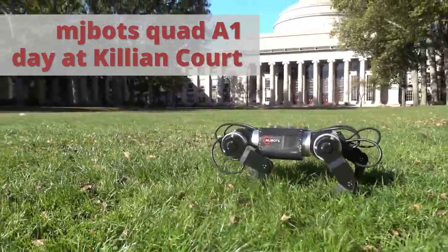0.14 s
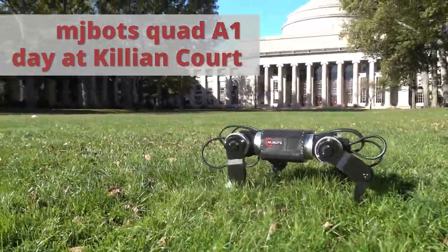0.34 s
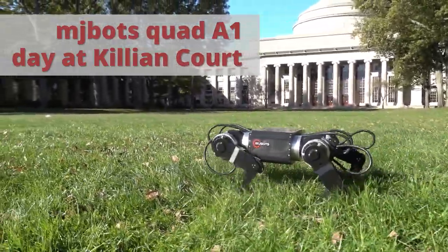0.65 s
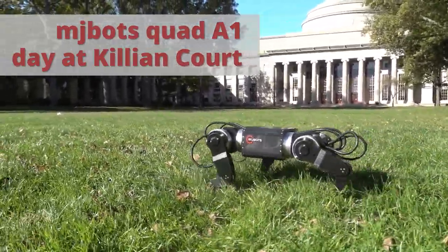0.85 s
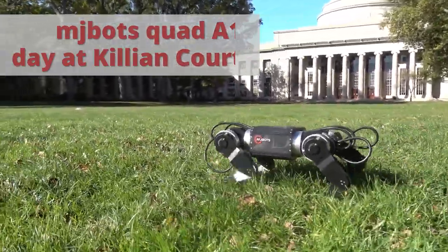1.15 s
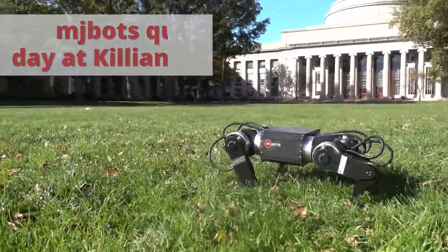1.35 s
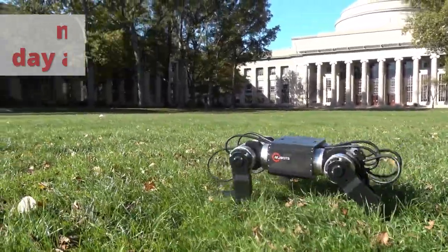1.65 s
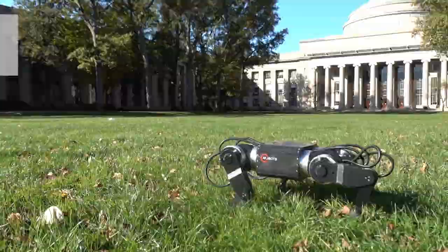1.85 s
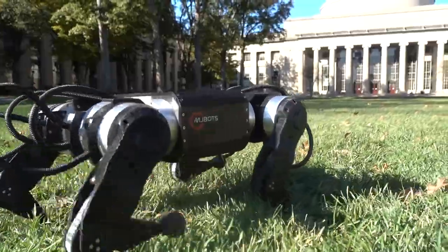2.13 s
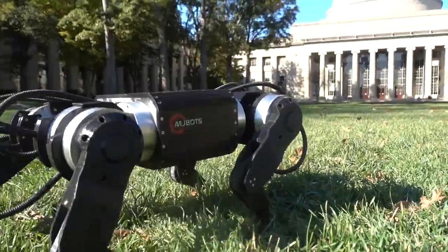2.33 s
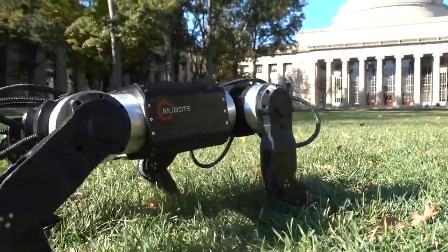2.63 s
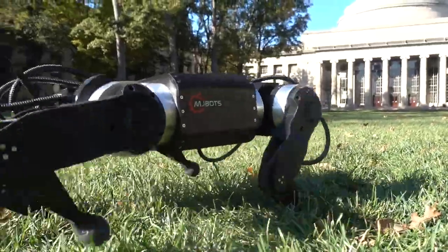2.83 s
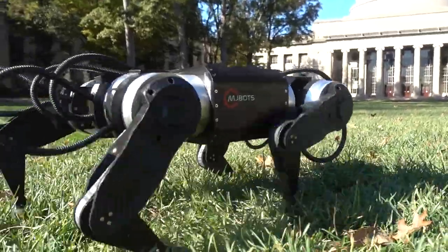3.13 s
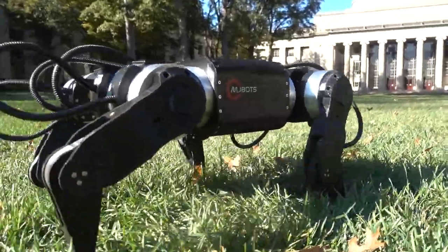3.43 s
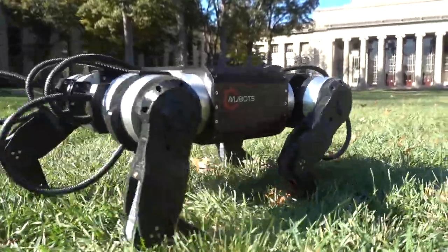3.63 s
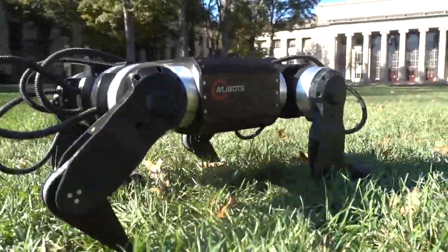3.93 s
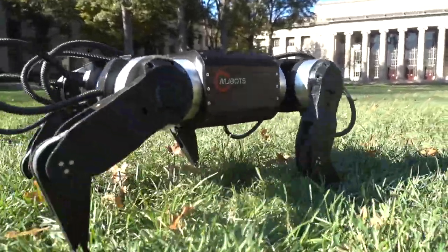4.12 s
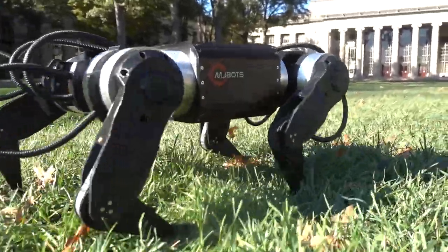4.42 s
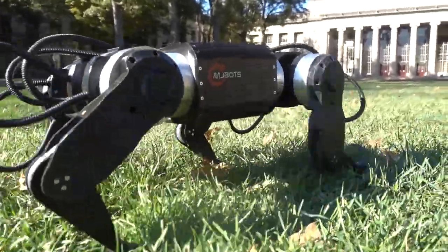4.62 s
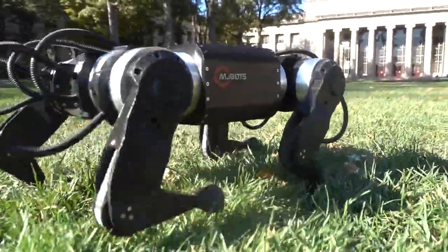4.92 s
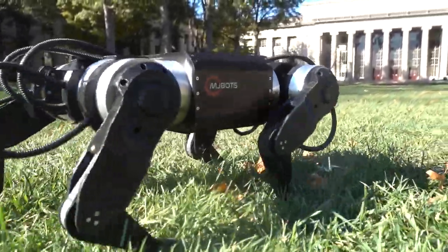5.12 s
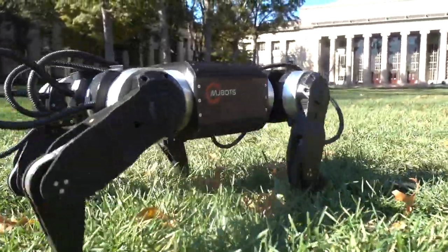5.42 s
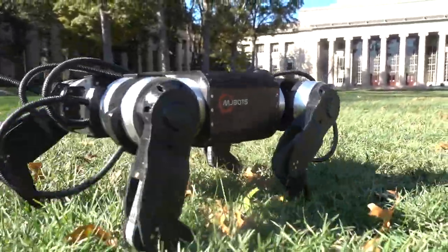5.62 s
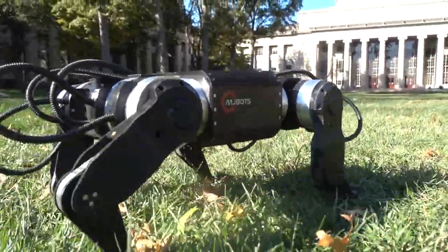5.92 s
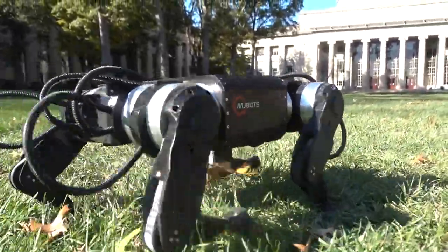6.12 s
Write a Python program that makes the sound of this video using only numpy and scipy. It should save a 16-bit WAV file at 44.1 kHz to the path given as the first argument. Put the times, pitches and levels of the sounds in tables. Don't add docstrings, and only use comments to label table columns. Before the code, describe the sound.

Open lawn, dry outdoor air, faint wide city rumble and hiss with small low wind buffets throughout. From 0 to 1.95 seconds a small four-legged robot trots some metres away: quick uneven grass swishes, muted gear chatter, bright brittle ticks and leaf snaps, busiest around 1.4 to 1.6 and sharp near 1.8, with a few dull thumps from 1 second. At 1.95 the scene cuts abruptly close. From about 2.1 to the end at roughly 6.4, steps come about every third of a second: a lift click, rough gear chatter as legs swing, brief high motor whines rising and falling, knocking gears as they reverse, then a landing clack and soft hollow thump. Strong clunks stand out near 4.4 and 5.0. Feet drag crisply through grass, especially near 3.25 and 5.3. The stereo microphone hears the close legs wide and detailed.

```python
import sys
import numpy as np
from scipy import signal
from scipy.fft import rfft, irfft, next_fast_len
from scipy.io import wavfile
from scipy.ndimage import uniform_filter1d, map_coordinates

SR = 44100
rng = np.random.default_rng(int(sys.argv[2]) if len(sys.argv) > 2 else 0)


def unload_wav(signal):
    wavfile.write(
        sys.argv[1],
        SR,
        np.round(np.clip(np.atleast_2d(signal).T, -1, 1) * 32767).astype(np.int16),
    )


def linear_from_db(decibels):
    return 10 ** (np.asarray(decibels, float) / 20)


N = 276066
TIME = np.arange(N) / SR
CUT = 1.951
TOP_HZ = 15850


def unit(x):
    return x / np.sqrt(np.mean(x ** 2) + 1e-20)


def along(points, hz):
    f, value = np.transpose(points)
    return np.interp(np.log(hz + 1), np.log(f + 1), value)


def filtered(x, response):
    m = next_fast_len(N + 8192)
    return irfft(rfft(x, m) * response(np.fft.rfftfreq(m, 1 / SR)), m)[..., :N]


def body(modes):
    def response(f):
        total = 0
        for k, (centre, width, db) in enumerate(modes):
            damping = 1j * f * width
            total = total + (-1) ** k * linear_from_db(db) * damping / (centre * centre - f * f + damping)
        return total
    return response


def wobble(rate):
    return map_coordinates(rng.standard_normal(int(N * rate / SR) + 4), [np.arange(N) * rate / SR])


# pitch_hz, level_db per Hz
CITY_COLOUR = [(20, -34), (65, -17), (100, -13.5), (223, -10.5), (309, -12.5), (373, -11), (560, -12.5),
               (714, -10.5), (840, -10.5), (1610, -11.5), (4490, -18.5), (11300, -20), (16000, -18.5)]
# pitch_hz, side_over_mid_db
CITY_WIDTH = [(60, -10), (300, -4), (1300, -7), (4400, -1), (15000, -9)]
# time_s, level_db
CITY_SWELL = [(0.0, -58), (.12, -56), (.25, -60), (.4, -59), (.46, -66), (.74, -55), (.88, -56), (1.0, -59),
              (1.14, -62), (1.25, -57), (1.38, -64), (1.62, -57), (1.8, -62), (2.1, -62), (2.35, -61),
              (2.55, -67), (2.83, -57), (3.08, -59), (3.3, -62), (4.1, -62), (4.35, -58), (4.77, -64),
              (5.99, -65), (6.25, -58)]


def city():
    swell = linear_from_db(np.interp(TIME, *np.transpose(CITY_SWELL)) + 2.0 + 1.6 * wobble(14))

    def tint(f):
        return linear_from_db(along(CITY_COLOUR, f) + [0 * f, along(CITY_WIDTH, f)])

    pair = filtered(rng.standard_normal((2, N)), tint)
    bass = filtered(pair, lambda f: 1 / (1 + (f / 400) ** 4))
    hiss = pair - bass
    hiss_gain = linear_from_db(-49.5 - 1.2 * (TIME > CUT))
    mid, side = swell * bass / np.std(bass[0]) + hiss_gain * hiss / np.std(hiss[0])
    return np.array([mid + side, mid - side])


# peak_s, half_length_s, level_db, pitch_hz
WIND_PUFFS = [(.09, .07, -55, 280), (.3, .06, -60, 150), (.75, .03, -55, 200), (.99, .04, -58, 180),
              (1.24, .04, -52, 250), (1.32, .015, -56, 250), (1.56, .04, -59, 200), (1.955, .012, -55, 220),
              (2.05, .012, -55, 230), (2.37, .012, -56, 280), (2.435, .022, -50, 180),
              (2.77, .04, -55, 220), (2.84, .03, -50, 200), (3.005, .022, -50, 190), (3.12, .015, -57, 280),
              (3.48, .02, -59, 200), (3.62, .02, -56, 220), (3.86, .03, -60, 200), (4.44, .02, -56, 230),
              (4.53, .02, -56, 230), (6.25, .02, -55, 200)]


def puffs():
    out, t = np.zeros((2, N + SR)), np.arange(SR // 2) / SR
    apart = .5
    noises = rng.standard_normal((len(WIND_PUFFS), 2, len(t)))
    for (s, half, db, hz), noise in zip(WIND_PUFFS, noises):
        bell = np.exp(-((t - .25) / half) ** 2)
        band = signal.butter(2, [hz / 1.6, hz * 1.6], "bandpass", fs=SR)
        mid, side = signal.lfilter(*band, noise)
        lump = bell * np.array([mid + apart * side, mid - apart * side])
        level = linear_from_db(db + 2.5) * np.linalg.norm(bell) / np.linalg.norm(bell * mid)
        start = round(s * SR) + SR // 4
        out[:, start:start + len(t)] += level * lump
    return out[:, SR // 2:][:, :N]


# start_s, peak_db, pitch_hz
BODY_KNOCKS = [(0.981, -49, 324), (1.064, -46.5, 400), (1.527, -43.5, 713), (1.948, -42.5, 497),
               (2.05, -48, 473), (2.189, -44, 360), (2.369, -61, 342), (2.645, -45, 345),
               (2.75, -45.5, 285), (3.025, -45.5, 287), (3.116, -58, 350), (3.619, -41, 312),
               (3.842, -49, 482), (4.28, -43.5, 360), (4.344, -43, 700), (4.622, -48, 623),
               (4.445, -46, 330), (4.7, -48, 340), (4.961, -42, 348), (2.7, -44, 340), (2.94, -44, 335),
               (3.165, -47, 335), (5.05, -47, 340), (5.181, -45.5, 397), (5.297, -44, 554),
               (5.6, -42, 330), (6.149, -47, 630)]


def knocks():
    out, t = np.zeros(N + SR), np.arange(SR // 8) / SR
    dull_band = signal.butter(2, [250, 900], "bandpass", fs=SR)
    noises = rng.standard_normal((len(BODY_KNOCKS), len(t)))
    for (s, db, hz), noise in zip(BODY_KNOCKS, noises):
        dull = unit(signal.lfilter(*dull_band, noise))
        ring = np.sin(2 * np.pi * hz * t) + 0.8 * dull
        push = 1 - np.exp(-t / 0.0016)
        fade = linear_from_db(db + 4.5 - 60 * t / 0.064)
        out[round(s * SR):][:len(t)] += fade * push * ring
    return out[:N]


# start_s, peak_db, pitch_hz
FAR_TICKS = [(.0144, -24, 1800), (.0374, -23, 2200), (.0804, -30, 3000), (.2254, -26, 6000),
             (.3024, -23, 2500), (.4294, -24, 4000), (.6004, -25, 3000), (.6114, -26, 2600),
             (.6325, -28, 4500), (.6983, -25, 7000), (.7746, -24, 6900), (.8254, -22, 6850),
             (.9936, -25, 7500), (1.1274, -26, 2500), (1.1618, -21, 7060), (1.2314, -25, 3000),
             (1.2885, -26, 7070), (1.3663, -25, 8300), (1.4084, -20, 7680), (1.4374, -20, 4590),
             (1.4634, -20, 10000), (1.4764, -21, 10000), (1.5115, -20, 5000), (1.5234, -19, 11000),
             (1.5424, -22, 5000), (1.5853, -25, 8000), (1.6866, -24, 4500), (1.8044, -24, 8200),
             (1.8874, -24, 5000), (1.9264, -26, 8000)]
# start_s, peak_db, pitch_hz
CLOSE_TICKS = [(2.0348, -36, 1800), (2.1884, -20, 2400), (2.3424, -33, 3500), (2.4733, -26, 1900),
               (2.5724, -22, 5410), (2.6449, -26, 2200), (2.6628, -21, 3200), (2.6843, -16, 3450),
               (2.7124, -29, 3740), (2.7244, -29, 2500), (2.8614, -22, 4500), (2.9494, -22, 5500),
               (3.043, -30, 2420), (3.0754, -32, 4000), (3.3583, -22, 2900), (3.3987, -24, 2500),
               (3.4526, -33, 2800), (3.4694, -34, 2800), (3.6404, -22, 2500), (3.8003, -29, 4150),
               (3.8696, -23, 2500), (3.9365, -23, 2500), (4.0253, -22, 3320), (4.0751, -26, 2800),
               (4.4244, -32, 2830), (4.5426, -22, 2800), (4.6614, -27, 3000), (4.7506, -27, 3000),
               (4.8055, -30, 2500), (4.9944, -25, 3000), (5.131, -35, 11000), (5.4748, -28, 2500),
               (5.4825, -30, 12000), (5.76, -33, 11000), (5.7673, -33, 2310), (5.9963, -28, 2260),
               (6.0384, -27, 3680), (6.0492, -20, 1960), (6.1574, -22, 2300), (6.2504, -22, 3250)]


def rattles():
    out, t = np.zeros(N + SR), np.arange(500) / SR
    swell_s, gain_db, span = .0008, -1.5, 1.45
    rows = FAR_TICKS + CLOSE_TICKS
    for (s, db, hz), noise in zip(rows, rng.standard_normal((len(rows), len(t)))):
        band = signal.butter(2, [hz / span, min(hz * span, TOP_HZ)], "bandpass", fs=SR)
        burst = signal.lfilter(*band, t * np.exp(-t / swell_s) * noise)
        out[round(s * SR):][:len(t)] += linear_from_db(db + gain_db) * burst / np.abs(burst).max()
    return out[:N]


# half of left_over_right_db for housing, shell and grass
LAYER_LEAN = [0.6, -0.1, -0.9]


def leaning(layers):
    return np.array([linear_from_db(LAYER_LEAN) @ layers, linear_from_db(-np.array(LAYER_LEAN)) @ layers])


# pitch_hz, width_hz, level_db
HOUSING_MODES = [(1052, 420, -6), (1634, 480, -1), (1896, 270, 2.5), (2170, 300, 1), (2806, 624, -3.5),
                 (3650, 1040, -5.5)]


def housing(f):
    return body(HOUSING_MODES)(f) * (1j * f / 900) ** 2 / (1 + 1j * f / 900) ** 2


# lift_s, turn_s, landing_s, lift_click_db, landing_db
TROT = [(2.081, 2.185, 2.266, -28, -34), (2.4846, 2.585, 2.672, -27, -33),
        (2.8303, 2.938, 2.998, -21.5, -37), (3.1656, 3.27, 3.362, -22, -34),
        (3.511, 3.618, 3.7, -20.5, -35), (3.845, 3.945, 4.03, -21, -35.5), (4.172, 4.28, 4.36, -20, -34),
        (4.5182, 4.619, 4.71, -19, -37.5), (4.8488, 4.956, 5.045, -16.5, -33.5),
        (5.1922, 5.3, 5.377, -20, -35), (5.492, 5.6, 5.685, -17.5, -36), (5.7953, 5.9, 6.002, -19, -39.5),
        (6.0501, 6.157, 6.25, -22.5, -35)]
# start_s, level_db
LEG_TICKS = [(.208, -32), (.4425, -33), (.5376, -31), (.6722, -30.5), (.884, -29), (.9398, -32),
             (1.2163, -23), (1.3181, -29), (2.135, -25.5), (2.1902, -20), (2.2624, -22), (2.2773, -32),
             (2.6892, -19), (2.9374, -22.5), (3.0234, -36), (3.3582, -21.5), (3.3758, -29), (3.4, -29),
             (3.6173, -24), (3.6996, -30), (3.7577, -34.5), (4.2836, -20.5), (4.375, -25), (4.9583, -22),
             (5.0436, -31), (4.986, -28), (5.382, -29), (5.5996, -29), (5.9, -32), (6.157, -24),
             (6.2426, -27)]
# start_s, level_db
HOUSING_CLUNKS = [(.3878, -22), (1.949, -28), (2.248, -21), (2.3294, -26.5), (2.5662, -21), (2.6754, -19),
                  (2.983, -17), (3.1983, -18), (3.595, -20), (3.678, -19), (3.71, -30), (3.7313, -25),
                  (4.258, -22), (4.347, -20), (4.375, -12), (4.468, -30), (4.939, -21), (5.0533, -14),
                  (4.6105, -24), (4.9854, -31), (5.0218, -15), (5.0736, -35), (5.221, -22), (5.2852, -20),
                  (5.579, -24), (5.659, -19), (5.6926, -18), (5.904, -18), (5.947, -20), (6.1343, -27)]
# start_s, level_db
LEAF_SNAPS = [(.111, -32), (.2303, -23), (.3235, -19.5), (.3275, -23), (.798, -21), (.8615, -28),
              (1.0456, -25), (1.0576, -38), (1.1177, -28), (1.123, -33), (1.2506, -22), (1.787, -25),
              (1.3332, -32), (1.6675, -34), (1.721, -28), (1.783, -15.5), (1.827, -20), (1.8362, -19),
              (1.84, -20), (3.1062, -38), (3.416, -34), (5.3127, -19), (5.6781, -25.5), (5.721, -34),
              (6.2243, -23)]


def contacts():
    lifts = [(lift, lift_db) for lift, turn, land, lift_db, land_db in TROT]
    kinds = [(lifts, (-1.5, 0.1, -16)),
             (LEG_TICKS, (-10, 0.1, -10)),
             (HOUSING_CLUNKS, (0.1, -15, -27)),
             (LEAF_SNAPS, (-25, -7.5, 0.1))]
    return [(s, *np.add(colour, db)) for table, colour in kinds for s, db in table]


# pitch_hz, width_hz, level_db
STRUCK_SHELL = [(4100, 1100, -0.5), (5900, 750, 5), (8000, 1600, 1)]


def clicks():
    blows, lead = np.zeros((3, N + 900)), 130
    t = (np.arange(700) - lead) / SR
    before = .7 * np.exp(t / .0007)
    after = np.exp(-t / .0011) + .2 * np.exp(-t / .004)
    shape = np.where(t < 0, before, after)
    rows = contacts()
    for (s, *dbs), noise in zip(rows, rng.standard_normal((len(rows), len(t)))):
        burst = shape * noise
        start = round(s * SR) - lead
        blows[:, start:start + len(t)] += linear_from_db(dbs)[:, None] * burst / np.linalg.norm(burst)

    def bright(f):
        return linear_from_db(along([(4000, -39), (8000, -3), (10000, 4), (16000, 1)], f))

    low, shell, crack = blows[:, :N]
    through_housing = linear_from_db(24) * filtered(low, housing)
    through_shell = linear_from_db(24) * filtered(shell, body(STRUCK_SHELL))
    bare = linear_from_db(18) * filtered(crack, bright)
    return leaning(np.array([through_housing, through_shell, bare]))


# peak_s, top_hz, stop_s (until standstill), level_db
MOTOR_WHINES = [(2.128, 6500, .06, -48), (2.221, 6150, .07, -49), (2.524, 6400, .04, -42),
                (2.615, 7300, .06, -46), (2.876, 7600, .045, -47), (3.225, 8000, .06, -44),
                (3.562, 7300, .045, -43), (3.889, 6650, .04, -39), (4.219, 6950, .05, -39),
                (4.561, 6950, .04, -38), (4.903, 7400, .045, -42), (5.236, 6800, .045, -39),
                (5.54, 7000, .045, -45), (5.839, 6900, .045, -38), (6.099, 6600, .04, -44),
                (6.199, 5850, .05, -47)]


def whine():
    out = np.zeros(N)
    flutter, rough, coarse = wobble(470), wobble(250), wobble(250)
    for s, top_hz, stop, db in MOTOR_WHINES:
        u = np.linspace(-.6, .6, round(1.2 * stop * SR))
        start = round((s - .6 * stop) * SR)
        at = slice(start, start + len(u))
        hz = top_hz * (1 - u ** 2) * (1 + .007 * flutter[at])
        turn = 2 * np.pi * np.cumsum(hz) / SR
        mesh = rough[at] * np.sin(turn / 3) + .6 * coarse[at] * np.sin(turn / 4)
        out[at] += linear_from_db(db + 6) * np.exp(-(u / .4) ** 4) * (np.sin(turn) + mesh)
    return out * linear_from_db(2.5 * wobble(200))


def chatter(rate, spread_db, hiss, lumpy_db, patchy_db):
    hit = rng.random(N) < rate / SR
    size = linear_from_db(spread_db * np.minimum(rng.exponential(size=N), 2.3))
    impacts = hit * size * rng.choice([-1, 1], N)
    rough = linear_from_db(lumpy_db * wobble(220)) * (unit(impacts) + hiss * rng.standard_normal(N))
    z = signal.stft(rough, nperseg=256)[2]
    field = uniform_filter1d(rng.standard_normal(z.shape), size=5, axis=0)
    field = uniform_filter1d(field, size=3, axis=1)
    return signal.istft(z * linear_from_db(patchy_db * unit(field)), nperseg=256)[1][:N]


# peak_after_moment_s, rise_s, fall_s, housing_db, shell_db, grass_db
STEP_JERK = (.005, .009, .008, -35, -38, -42)
STEP_SWING = (.045, .024, .033, -34.5, -35.5, -45)
STEP_TURN = (.008, .016, .037, -33.8, -34.2, -48)
STEP_LANDING = (.001, .028, .024, 0.1, -7, -9)
STEP_SETTLE = (.03, .03, .04, -14, -18, -15)
# peak_s, rise_s, fall_s, level_db
CLOSE_DRAGS = [(2.35, .06, .1, -48), (2.487, .014, .009, -40), (2.72, .02, .012, -44),
               (2.75, .012, .006, -50), (3.02, .04, .03, -48), (3.08, .03, .03, -44), (3.46, .03, .03, -49),
               (3.8, .03, .02, -48), (3.135, .07, .03, -43), (3.25, .04, .075, -29.5),
               (3.42, .02, .02, -46), (3.72, .01, .045, -50), (3.846, .037, .005, -37.5),
               (4.03, .055, .075, -37.5), (4.356, .069, .025, -43), (5.44, .03, .03, -47),
               (4.465, .043, .043, -50), (4.65, .03, .03, -42), (4.715, .027, .007, -39),
               (4.758, .026, .059, -37.5), (5.075, .089, .093, -55), (5.249, .028, .008, -37),
               (5.306, .027, .04, -30.5), (5.419, .0055, .04, -47), (5.48, .012, .015, -45),
               (5.62, .04, .09, -41), (5.77, .025, .02, -47), (5.829, .029, .041, -43),
               (6.002, .045, .015, -46), (6.098, .04, .017, -37), (6.18, .03, .04, -42)]
# peak_s, rise_s, fall_s, level_db
FAR_DRAGS = [(.01, .03, .044, -32), (.08, .09, .035, -43), (.13, .019, .025, -40),
             (.243, .013, .0053, -28.5), (.294, .058, .066, -35.5), (.382, .016, .021, -37.5),
             (.438, .057, .009, -44), (.49, .037, .022, -45), (.548, .011, .046, -32),
             (.677, .037, .015, -37.5), (.705, .011, .026, -33.5), (.754, .017, .09, -39),
             (.804, .021, .021, -29), (.877, .02, .052, -39.5), (.939, .014, .035, -35),
             (1.005, .018, .014, -36), (1.046, .017, .042, -39), (1.127, .015, .009, -33),
             (1.183, .025, .021, -30.5), (1.236, .014, .023, -31), (1.3, .018, .06, -33.5),
             (1.422, .032, .05, -27), (1.515, .055, .038, -27), (1.591, .013, .084, -40),
             (1.7, .014, .03, -35), (1.758, .015, .033, -30), (1.786, .008, .034, -34),
             (1.833, .0043, .085, -39), (1.902, .013, .026, -39)]
# time_s, housing_db
FAR_EFFORT = [(0.0, -45), (.1, -46), (.15, -52), (.21, -40), (.4, -44), (.61, -38), (.7, -44), (.83, -42),
              (.94, -48), (1.05, -43), (1.3, -39.5), (1.5, -37.5), (1.8, -40), (1.87, -44), (1.95, -39)]


def strokes():
    rows = []
    for lift, turn, land, lift_db, land_db in TROT:
        turn_db = .2 * (lift_db + 20)
        phases = [(lift, STEP_JERK, 0), (lift, STEP_SWING, 0), (turn, STEP_TURN, turn_db),
                  (land, STEP_LANDING, land_db), (land, STEP_SETTLE, land_db)]
        for s, (lag, rise, fall, *dbs), db in phases:
            rows.append((s + lag, rise, fall, *np.add(dbs, db)))
    for s, rise, fall, db in CLOSE_DRAGS:
        rows.append((s, rise, fall, db - 5.5, db - 6.5, db))
    for s, rise, fall, db in FAR_DRAGS:
        gear_db = np.interp(s, *np.transpose(FAR_EFFORT))
        shell_db = -40 + .6 * (db + 35)
        rows.append((s, rise, fall, gear_db, shell_db, db))
    return rows


def effort():
    power = np.zeros((3, N))
    for s, rise, fall, *dbs in strokes():
        near = slice(max(round((s - 3 * rise) * SR), 0), round((s + 3 * fall) * SR))
        late = TIME[near] - s
        bell = np.exp(-(late / np.where(late < 0, rise, fall)) ** 2)
        same_scene = (TIME[near] < CUT) == (s < CUT)
        power[:, near] += linear_from_db(dbs)[:, None] ** 2 * bell * same_scene
    return np.sqrt(power)


# pitch_hz, width_hz, level_db
TRUNK = [(332, 35, 2), (642, 260, -3.5)]
# pitch_hz, width_hz, level_db
MOTOR_CANS = [(1600, 120, 0.1)]
# pitch_hz, level_db
LAWN_LOSS = [(300, -3.5), (1100, -2), (1600, -5), (2200, -.3), (3500, 2.5)]
# time_s, level_db
LEG_LOAD = [(0, 1), (.9, .1), (1.25, -2), (1.9, 1), (2.12, -1), (2.3, -2), (2.55, -3), (2.9, -1),
            (3.25, -4), (3.55, .1), (3.8, -3), (4.3, .1), (4.55, -.1), (4.7, -5), (5., -1), (5.25, -4),
            (5.7, .1), (6.25, -1)]


def gears(teeth):
    ringing = unit(filtered(teeth, housing)) + linear_from_db(-20) * unit(filtered(teeth, body(TRUNK)))
    far = filtered(ringing, lambda f: linear_from_db(along(LAWN_LOSS, f)))
    close = linear_from_db(-.5) * ringing - linear_from_db(-15) * unit(filtered(teeth, body(MOTOR_CANS)))
    geared = np.where(np.arange(N) < CUT * SR, far, close)
    low = filtered(geared, lambda f: 1 / (1 + (f / 1800) ** 8) / (1 + (900 / (f + 1)) ** 8))
    load_db = np.interp(TIME, *np.transpose(LEG_LOAD)) + 1.5 * wobble(25)
    return geared + (linear_from_db(load_db) - 1) * low


# pitch_hz, width_hz, level_db
SHELL_MODES = [(4436, 250, 5.5), (5670, 1034, 1.5), (6710, 990, 3), (8170, 1470, -1)]
# pitch_hz, level_db per Hz
GRASS_COLOUR = [(3000, -19), (6000, -14.5), (8000, 1.5), (11000, 2.5), (15800, 4), (17000, -11)]


def legs():
    teeth = chatter(2500, spread_db=4, hiss=0.59, lumpy_db=2.1, patchy_db=2.0)
    blades = chatter(5000, spread_db=3, hiss=0.43, lumpy_db=1.4, patchy_db=3.5)
    shells = unit(filtered(teeth, body(SHELL_MODES)))
    brushed = unit(filtered(blades, lambda f: linear_from_db(along(GRASS_COLOUR, f))))
    return leaning(linear_from_db(0.5) * effort() * [gears(teeth), shells, brushed])


# pitch_hz, side_over_mid_db
ROBOT_WIDTH = [(200, -14), (450, -5), (900, -18), (1500, -13), (2200, -9.5),  (6000, -.6), (9000, -8.5),
               (15000, -6.5)]


def ports(x, drift):
    hz, _, z = signal.stft(x, SR, nperseg=128)
    phase = drift * unit(uniform_filter1d(rng.standard_normal(z.shape), 24, 1))
    turned = z * np.exp(1j * phase) * linear_from_db(along(ROBOT_WIDTH, hz))[:, None]
    side = signal.istft(turned, SR, nperseg=128)[1][:N]
    return np.array([side, -side])


def scene():
    background = city() + puffs()
    robot = knocks() + rattles() + clicks() + whine() + legs()
    return background + robot + linear_from_db(1.0) * ports(robot.mean(0), drift=3.12)


def roll_off(x):
    return signal.sosfilt(signal.butter(12, 17040, fs=SR, output="sos"), x)


def record(dry):
    heard = filtered(dry, lambda hz: (hz < TOP_HZ) * hz ** 2 / (hz ** 2 + 63 ** 2))
    return roll_off(heard)


dry = scene()
out = record(dry)
unload_wav(out)
```